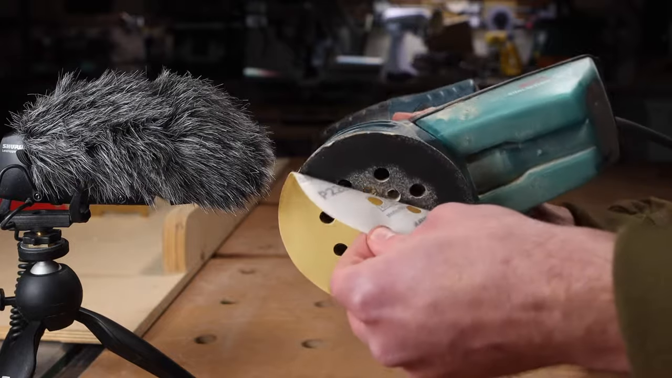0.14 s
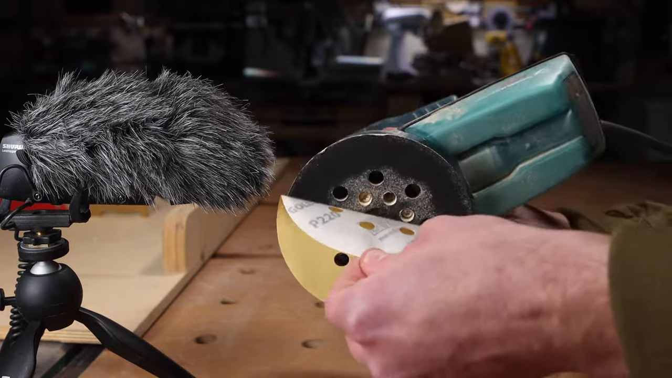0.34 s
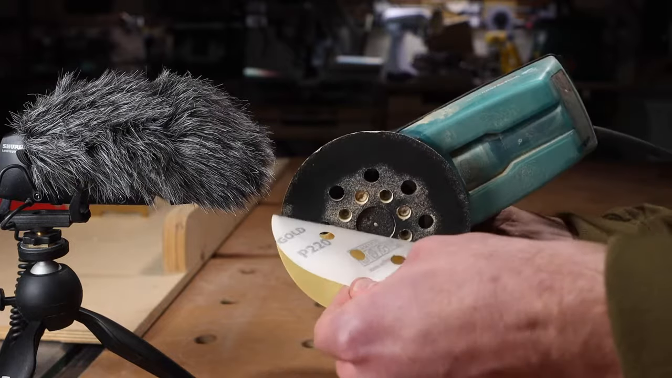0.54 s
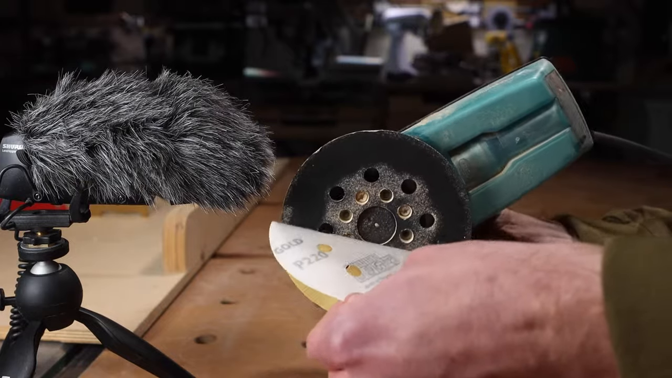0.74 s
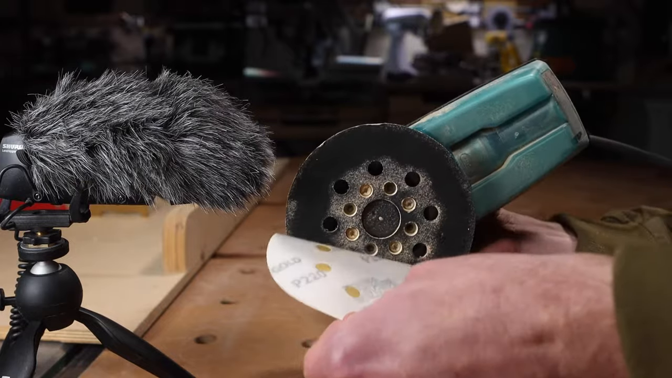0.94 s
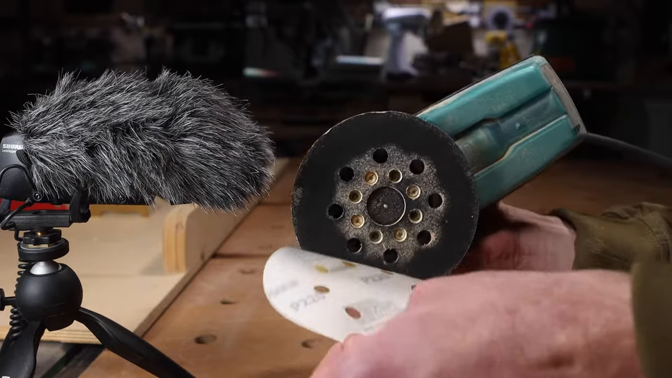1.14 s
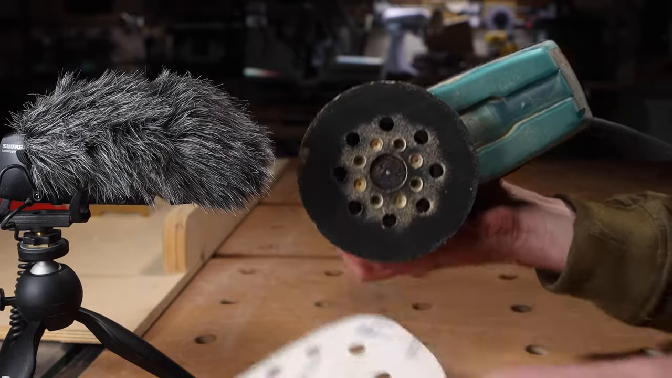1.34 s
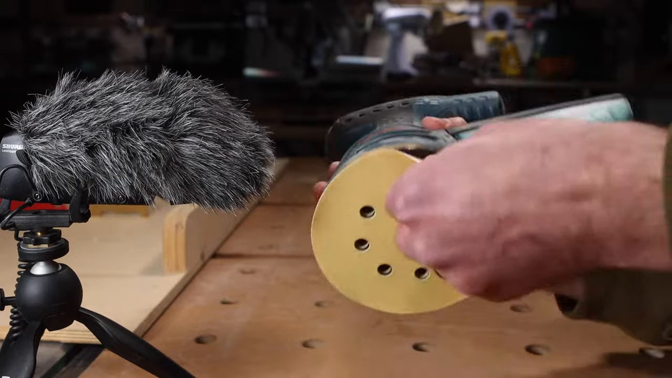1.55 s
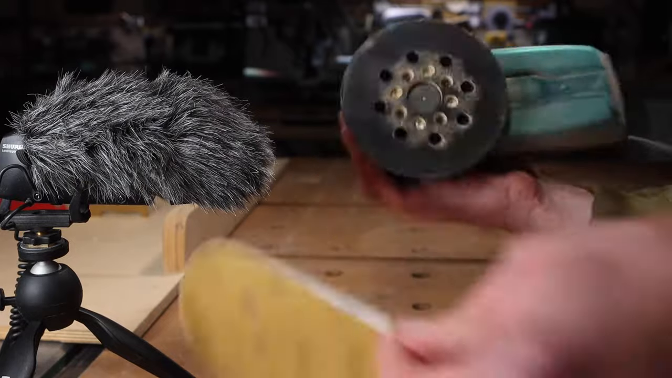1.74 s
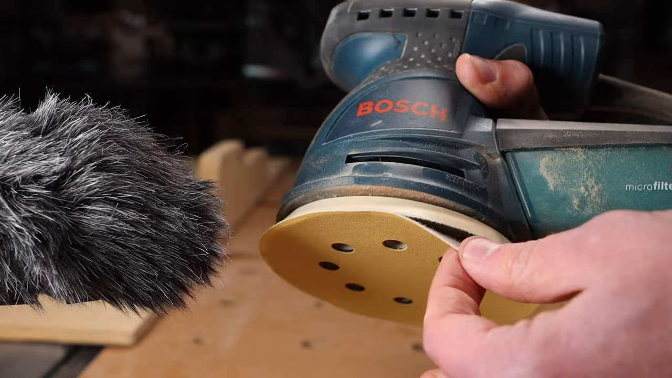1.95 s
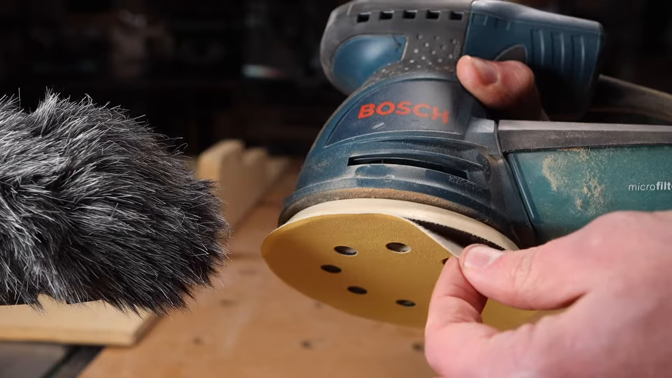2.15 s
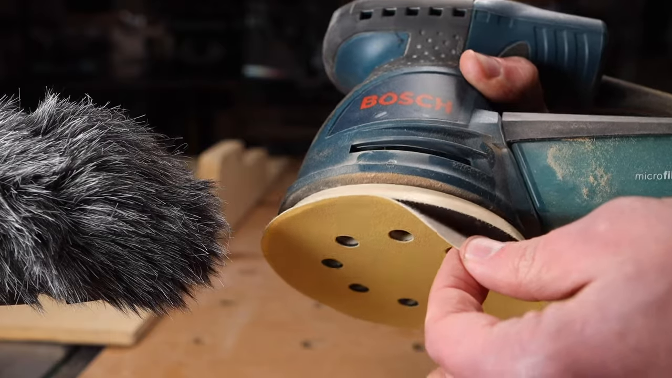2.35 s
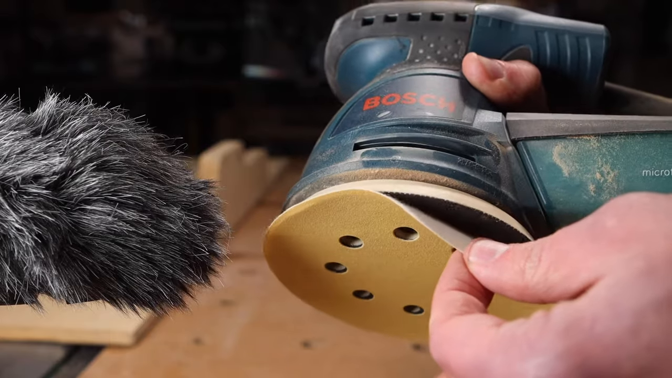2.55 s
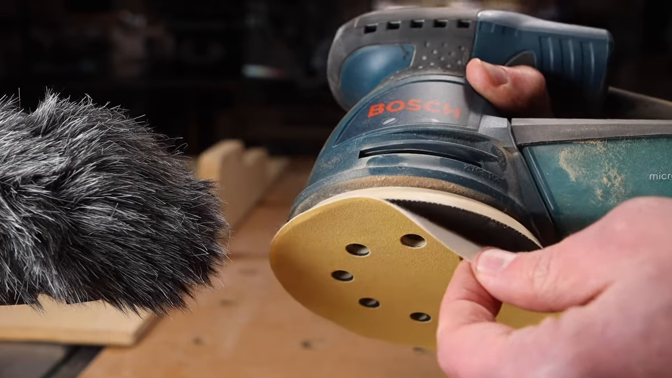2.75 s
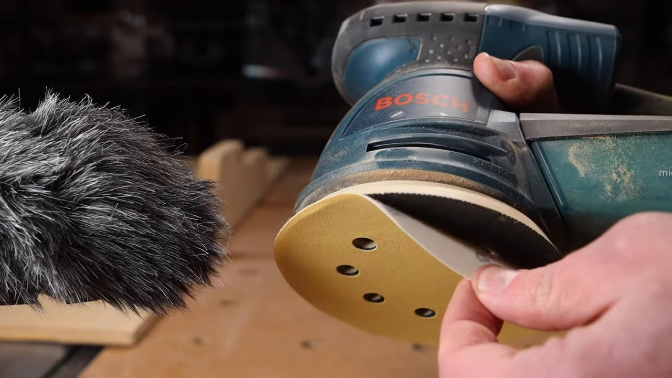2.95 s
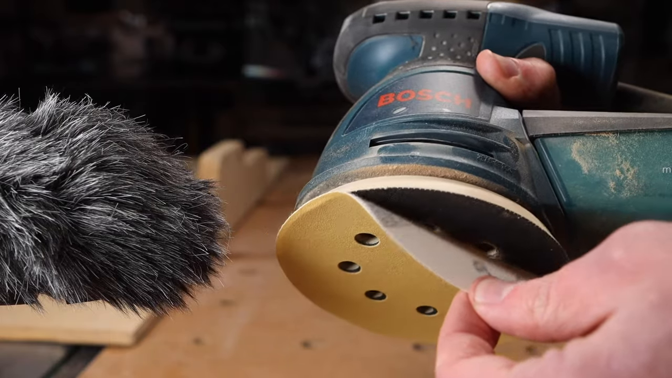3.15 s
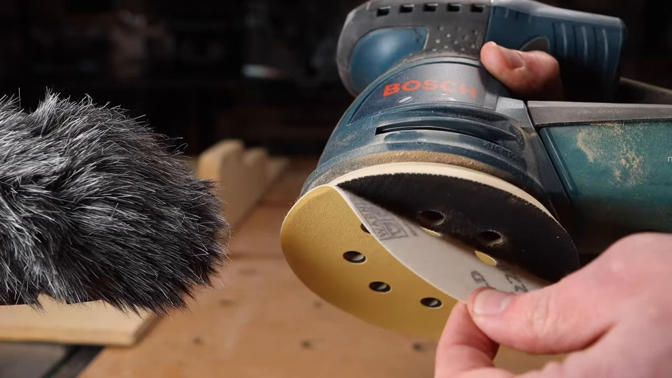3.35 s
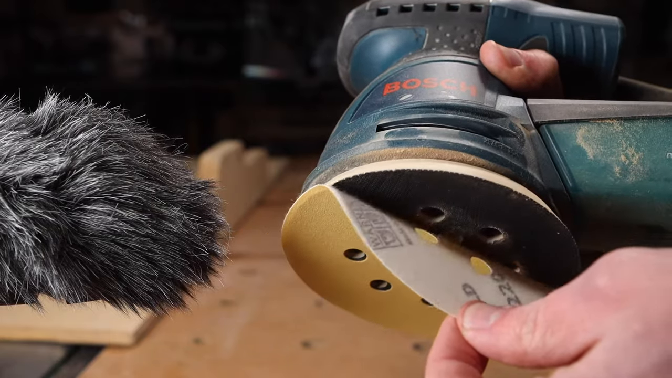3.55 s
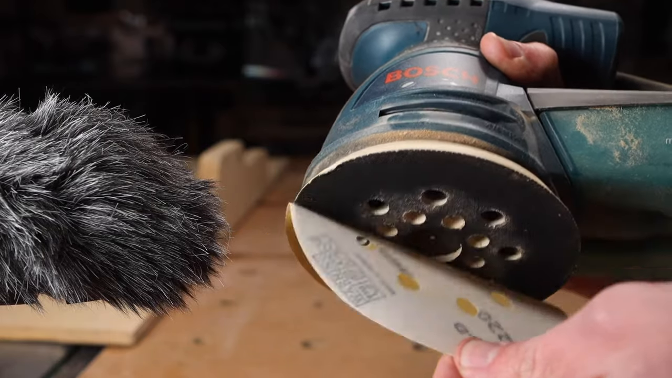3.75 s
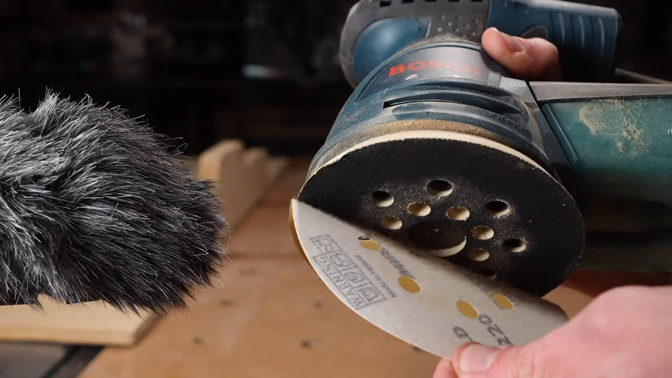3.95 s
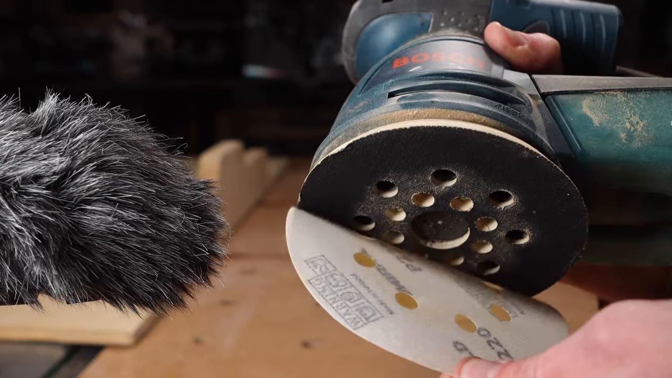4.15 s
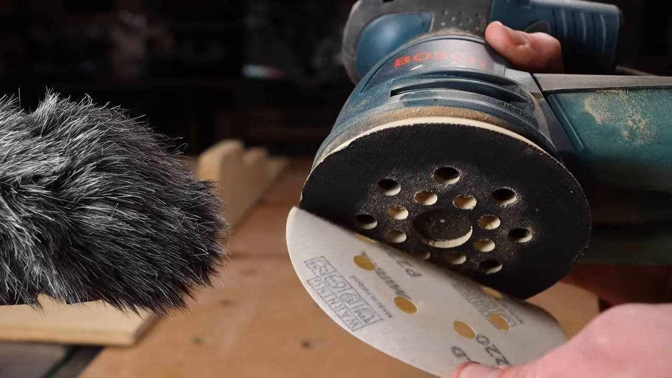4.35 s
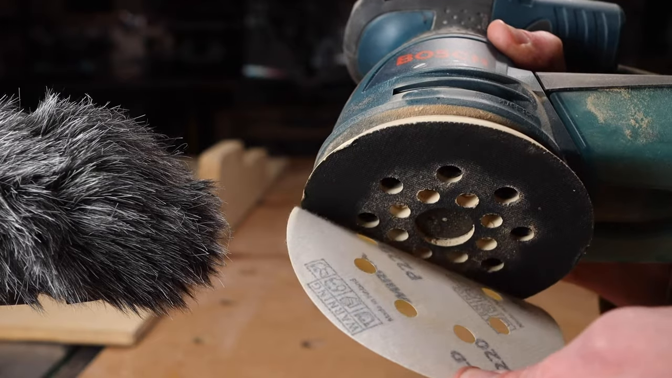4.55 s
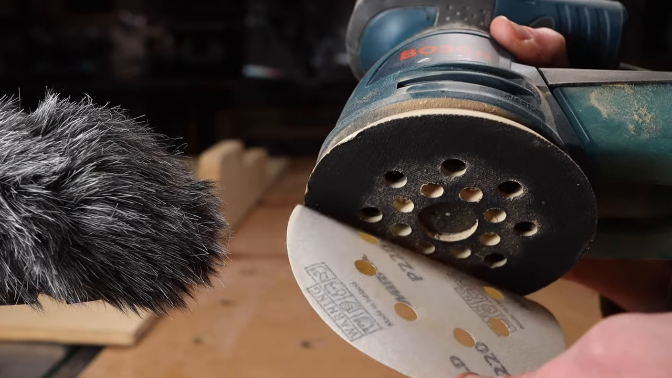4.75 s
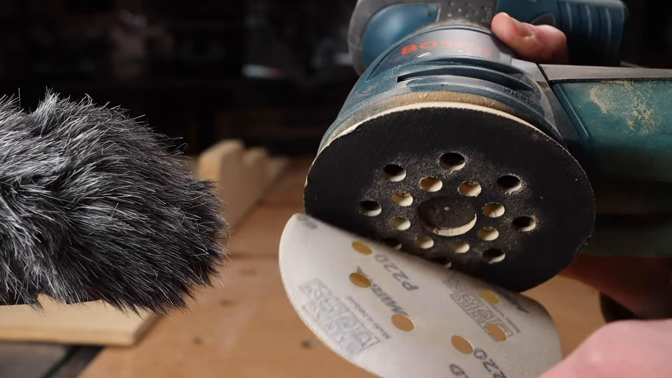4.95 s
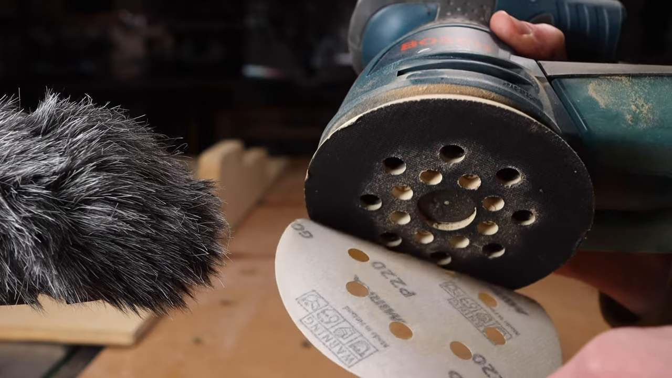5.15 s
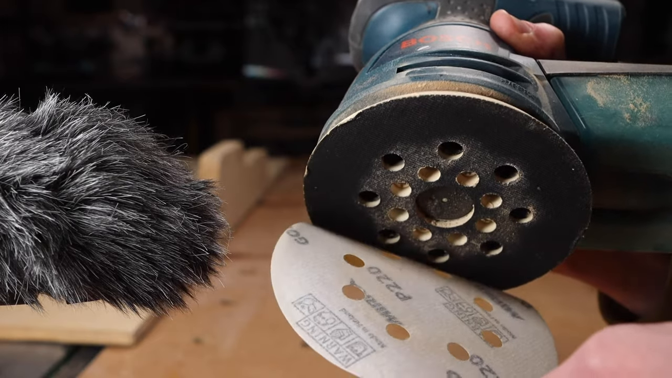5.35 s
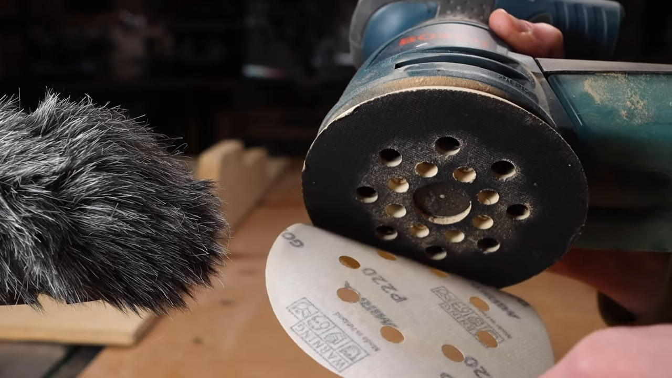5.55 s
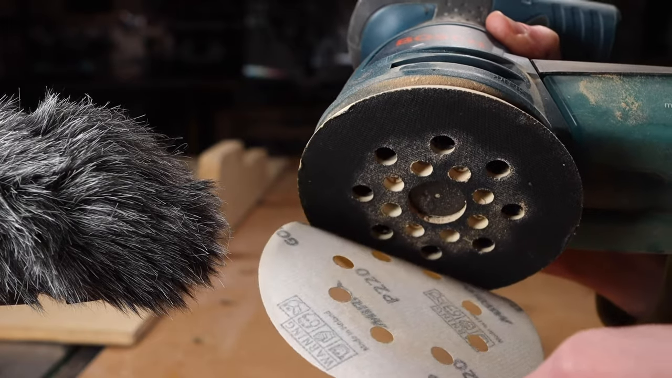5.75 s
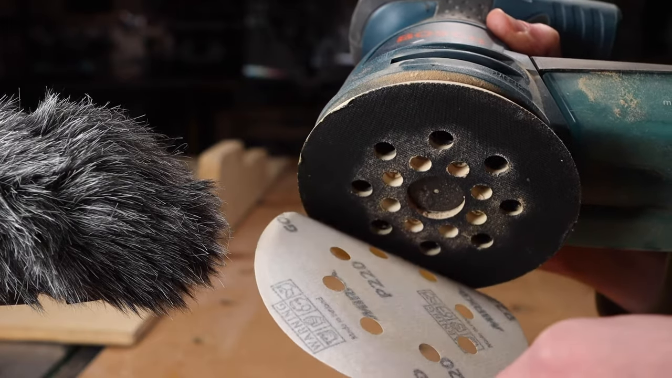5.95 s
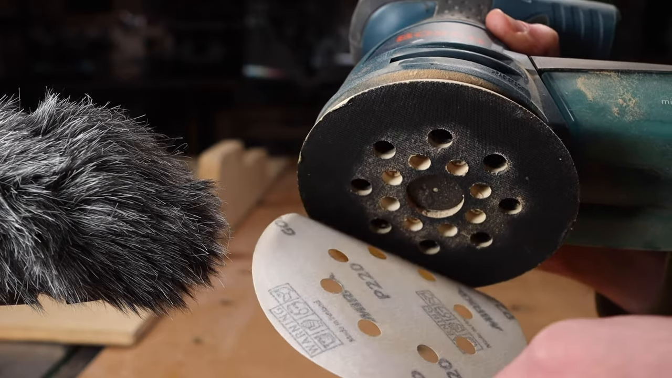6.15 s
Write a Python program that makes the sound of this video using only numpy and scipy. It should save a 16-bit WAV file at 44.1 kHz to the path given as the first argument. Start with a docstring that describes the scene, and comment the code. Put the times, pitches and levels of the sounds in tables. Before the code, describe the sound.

A sanding disc is peeled off a sander's hook-and-loop pad in crackly rips and slow tugs, close up in a quiet workshop.

```python
"""Over the faint hum of a small workshop, a paper sanding disc is peeled off a hook-and-loop pad.
It starts with quick rips: each hook that lets go snaps and rings the paper, fast pulls blur the
snaps into noise, and the loose flap shakes and swings. At 1.36 s the pad is turned to face the
microphone and its tone changes. Slow tugs follow, with single snaps standing out, until the last
fades near 6.3 s. Throughout, the room answers with a short tail."""
import sys
import numpy as np
from scipy import signal
from scipy.fft import rfft, irfft, next_fast_len
from scipy.io import wavfile
from scipy.ndimage import uniform_filter1d, map_coordinates

SR = 44100
rng = np.random.default_rng(int(sys.argv[2]) if len(sys.argv) > 2 else 0)


def write(x):
    x = np.atleast_2d(x).T
    wavfile.write(sys.argv[1], SR, np.round(np.clip(x, -1, 1) * 32767).astype(np.int16))


N = 277830


def amp(db):
    """Decibel law: amplitude grows tenfold every 20 dB."""
    return 10 ** (np.asarray(db) / 20)


def unit_rms(x):
    """Normalisation to a mean power of 1."""
    return x / np.sqrt(np.mean(x ** 2) + 1e-20)


def along(points, hz):
    """Interpolation of (frequency_hz, value) points on a logarithmic frequency axis."""
    point_hz, values = np.transpose(points)
    return np.interp(np.log(hz + 1), np.log(point_hz + 1), values)


def wobble(rate_hz):
    """Slow random modulation: a spline through rate_hz random values a second."""
    knots = rng.standard_normal(int(N * rate_hz / SR) + 4)
    return map_coordinates(knots, [np.arange(N) * rate_hz / SR])


def coloured(x, spectrum, modes):
    """Minimum-phase filtering by a spectrum plus resonance peaks, at a mean power gain of 1."""
    size = next_fast_len(N + 8192)
    hz = np.fft.rfftfreq(size, 1 / SR)
    peaks_db = sum(db / (1 + (2 * (hz - centre) / width) ** 2) for centre, width, db in modes)
    gain = unit_rms(amp(along(spectrum, hz) + peaks_db)) + 1e-5
    cepstrum = irfft(np.log(gain), size)
    cepstrum[1:size // 2] *= 2  # folding onto positive time makes the filter causal
    cepstrum[size // 2 + 1:] = 0
    return irfft(rfft(x, size) * np.exp(rfft(cepstrum)), size)[:N]


# Spectrum of the room's noise floor: frequency_hz, density_db
FLOOR_SPECTRUM = [(25, -20), (120, -8.5), (300, -15), (600, -6), (1000, -16.5), (3000, -15.5), (8000, -22),
                  (16000, -33)]

def room_floor():
    """Stationary broadband noise, in which one narrow resonance is heard as a faint low hum."""
    hum = [(125, 14, 14)]  # centre_hz, width_hz, boost_db
    return amp(-58.5) * unit_rms(coloured(rng.standard_normal(N), FLOOR_SPECTRUM, hum))


# Reverberation time of the workshop: frequency_hz, t60_s
WORKSHOP_DECAY = [(200, 0.55), (1400, 0.43), (4000, 0.45), (12000, 0.26)]

def workshop_reverb(x):
    """Reverberation: convolution with a diffuse tail in which each frequency decays at its own rate."""
    hz, t, noise = signal.stft(rng.standard_normal(SR // 2), SR, nperseg=256)
    decay = amp(-60 * t / along(WORKSHOP_DECAY, hz)[:, None])
    tail = signal.istft(noise * decay, SR, nperseg=256)[1]
    delayed = np.pad(x, (250, 0))
    return signal.fftconvolve(delayed, tail / np.linalg.norm(tail))[:N]


# Swings of the whole loose flap: start_s, length_s, pitch_hz, peak_db
FLAP_SWINGS = [(.44, 0.1, 138.4, -25.5), (.86, 0.096, 118.6, -24), (1.22, 0.059, 146, -18),
               (1.752, 0.037, 72.4, -21)]

def flap_swings():
    """Free vibration: the flap swings for a few cycles, a low tone under a half-sine envelope."""
    out = np.zeros(N)
    for start_s, length_s, pitch_hz, peak_db in FLAP_SWINGS:
        t = np.arange(int(length_s * SR)) / SR
        envelope = amp(peak_db) * np.sin(np.pi * t / length_s)
        out[int(start_s * SR):][:len(t)] -= envelope * np.sin(2 * np.pi * pitch_hz * t)
    return out


# The freed part of the disc, which flaps lower as it grows: time_s, relative_level_db, resonance_hz
FREED_SHEET = [(0.0, -12, 360), (0.32, -17.5, 270), (0.47, -16, 148), (0.75, -9, 166), (0.9, -3.5, 154),
               (1.28, -7.5, 130), (1.34, -25, 95), (1.42, -26, 105), (1.55, -20, 400), (1.65, -15, 433),
               (1.72, -15, 256), (1.78, -6, 94), (1.84, -24, 120), (2.0, -23, 304), (2.6, -21.5, 380),
               (3.25, -19.5, 350), (3.55, -13, 360), (3.8, -21, 265), (4.1, -20.5, 210), (4.4, -24.5, 167),
               (4.95, -22, 215.4), (5.25, -22.5, 340), (6.3, -23, 178)]

def flap_shake(rip):
    """Forced vibration: jerky pulls drive the paper's wandering bending mode over a low push of air."""
    time_s, level_db, resonance_hz = np.transpose(FREED_SHEET)
    force = np.abs(uniform_filter1d(rip ** 2, size=300)) + 1e-6
    jerk = (force / uniform_filter1d(force, size=4000)) ** 0.18  # clumps of hooks jolt the sheet
    hz, t, jolts = signal.stft(rng.standard_normal(N) * jerk, SR, nperseg=2048, noverlap=1536)
    ratio = (hz[:, None] + 1) / np.interp(t, time_s, resonance_hz)
    resonance = 1 / np.sqrt((1 - ratio ** 2) ** 2 + (ratio * 1.01) ** 2)
    bending = resonance * ratio ** 1.52 / (1 + (ratio / 1.99) ** 4)
    air_push = 0.59 * np.exp(-np.log((hz[:, None] + 1) / 105) ** 2 / 0.2)
    gain = np.hypot(bending, air_push)
    gain /= np.sqrt(np.sum(gain ** 2, axis=0))  # same power at every pitch
    shaken = unit_rms(signal.istft(jolts * gain, SR, nperseg=2048, noverlap=1536)[1][:N])
    linger_s, firm_rip_db, flap_db_per_rip_db = 0.01, -18.5, 1.5
    pole = np.exp(-1 / (linger_s * SR))
    drive_power = signal.lfilter([1 - pole], [1, -pole], rip ** 2) / amp(firm_rip_db) ** 2
    level = amp(np.interp(np.arange(N) / SR, time_s, level_db) - 21)
    return level * np.abs(drive_power) ** (flap_db_per_rip_db / 2) * shaken


def sheet_flexing(x, depth_db):
    """Spectral modulation: as the sheet changes shape, its resonances swell and fade at random."""
    spectra = signal.stft(x, nperseg=128)[2]
    field = uniform_filter1d(rng.standard_normal(spectra.shape), size=2, axis=0)  # smooth over pitch
    field = uniform_filter1d(field, size=40, axis=1)  # and over time
    return signal.istft(spectra * amp(depth_db * unit_rms(field)), nperseg=128)[1][:N]


def fibre_rattle(kicks, spike_gain, rise_s, lowpass_hz, t60_s=0.014):
    """Impulse excitation: each kick starts a damped rattle of fibres, with a spike just after onset."""
    t = np.arange(SR // 20) / SR
    envelope = amp(-60 * t / t60_s) * (1 - np.exp(-t / rise_s))
    power = signal.fftconvolve(kicks ** 2, envelope ** 2)[:N]  # overlapping rattles add in power
    noise = np.sqrt(np.abs(power)) * rng.standard_normal(N)
    pole = np.exp(-2 * np.pi * lowpass_hz / SR)
    rattle = signal.lfilter([1 - pole], [1, -pole], noise)
    return rattle + spike_gain * np.pad(kicks, (SR // 3000, 0))[:N]


# Spectrum of a hook's bright tick: frequency_hz, density_db
TICK_SPECTRUM = [(1410, -58.5), (2400, -19), (3060, -19), (3540, -3.5), (5810, 0.5), (7720, -4), (9010, -5),
                 (15200, -13.5), (16000, -30), (16700, -39)]
# Ring of the freed paper, with the pad side-on and facing: frequency_hz, density_db
RING_SIDE = [(240, -19), (400, -11), (552, -9.5), (802, -10), (1040, -5), (1710, -1), (1880, 1.5),
             (3200, -2), (4160, -34), (7040, -120)]
RING_FRONT = [(240, -36), (400, -11), (868, -17.5), (1090, -6), (1570, 3), (2110, -0.5), (3200, -2.5),
              (4160, -35.5), (7040, -120)]
# Cavity modes of the holed pad, side-on and facing: centre_hz, width_hz, boost_db
CAVITY_SIDE = [(2290, 470, 2), (3130, 470, 2.5), (6650, 910, 3)]
CAVITY_FRONT = [(1560, 220, 1), (3093, 590, 6), (4350, 610, 1.5), (5640, 1360, 1.5)]

def pad_radiation(tick, ring, turn_s=1.36):
    """Directivity: tick and ring change colour when the pad turns from side-on to facing."""
    side_on = np.arange(N) < turn_s * SR
    return (coloured(tick * side_on, TICK_SPECTRUM, CAVITY_SIDE)
            + coloured(ring * side_on, RING_SIDE, CAVITY_SIDE)
            + coloured(tick * ~side_on, TICK_SPECTRUM, CAVITY_FRONT)
            + coloured(ring * ~side_on, RING_FRONT, CAVITY_FRONT))


# Tugs on the disc: start_s, swell_s, hold_s, ease_s, pull_db, start_below_pull_db, ring_over_tick_db
DISC_TUGS = [(0.0, 0.0063, 0.073, 0.018, -19, -1, -2.5), (0.176, 0.12, 0.041, .025, -18.5, 8, -0.5),
             (0.381, 0.04, 0.089, 0.031, -18, 17, 0), (0.585, 0.0039, 0.18, 0.0093, -25.5, -1, 0.5),
             (0.827, 0.015, 0.41, 0.028, -21.5, 17, 1), (1.232, .05, 0.013, .008, -15.5, 7.5, 2),
             (1.41, 0.0065, 0.078, .01, -35, 2, -6), (1.51, 0.091, 0.042, .01, -25.5, 7.5, 0.5),
             (1.606, 0.053, 0.076, .011, -12, 12, 0), (2.154, 0.025, 0.012, 0.012, -24.5, 8, -7.5),
             (2.281, 0.0069, 0.077, 0.038, -30, 11, -1.5), (2.433, 0.0054, .015, .01, -27, 4, -9),
             (2.492, 0.054, 0.031, 0.028, -24.5, 10.5, -2.5), (2.78, .035, 0.034, 0.0074, -21, 13, -4),
             (2.862, 0.014, 0.06, 0.048, -20.5, 11, -3.5), (2.96, 0.012, 0.092, 0.031, -26, -9, -1.5),
             (3.14, 0.088, 0.033, 0.043, -16.5, 14.5, -3), (3.408, .01, 0.015, 0.0062, -34, 4, -3.5),
             (3.462, .06, .045, .008, -23.5, 7, -1.5), (3.591, 0.019, 0.028, .01, -24, -4, -4),
             (3.647, .045, 0.12, .016, -15.5, 7.5, -2.5), (4.02, .02, 0.059, 0.024, -17, 11, -2.5),
             (4.281, 0.051, 0.017, 0.02, -23, 8, -3.5), (4.441, 0.0038, 0.015, 0.0056, -34, 6, 2.5),
             (4.512, 0.0073, 0.011, 0.019, -34, 4, 0), (4.6, 0.0031, 0.0049, 0.0071, -25, 4, -4.5),
             (4.657, 0.05, 0.034, .01, -28.5, 8.5, -4.5), (4.823, 0.014, 0.063, 0.014, -28.5, 3.5, -0.5),
             (4.915, .015, 0.079, 0.034, -24.5, 8.5, -2.5), (5.095, 0.036, 0.058, 0.034, -23.5, 7.5, -2.5),
             (5.235, 0.037, 0.026, 0.027, -22.5, 14, -2.5), (5.403, 0.011, .02, .008, -33.5, -6.5, -2.5),
             (5.507, 0.036, 0.019, 0.043, -31, -3, -4), (5.7, 0.048, 0.079, 0.014, -35.5, 0, 0.5),
             (5.9, 0.0043, 0.039, 0.014, -24.5, 4, -5.5)]

def tug_envelopes():
    """Amplitude envelopes: pull strength and relative paper ring in dB; the strongest tug prevails."""
    sag_db, end_drop_db = 1.5, 12  # the hold sags as fewer hooks are left, then the tug eases off
    ring_growth_db = 1  # the paper rings more as more of it hangs free
    t = np.arange(N) / SR
    pull_db, ring_db = np.full(N, -120.), np.zeros(N)
    for start_s, swell_s, hold_s, ease_s, level_db, below_db, ring_over_db in DISC_TUGS:
        corners_s = start_s + np.cumsum([0, swell_s, hold_s, ease_s])
        tug_db = level_db - np.interp(t, corners_s, [below_db, 0, sag_db, end_drop_db])
        active = (t >= start_s) & (t < corners_s[-1]) & (tug_db > pull_db)
        progress = (t[active] - start_s) / (corners_s[-1] - start_s)
        pull_db[active] = tug_db[active]
        ring_db[active] = ring_over_db + ring_growth_db * (progress - .5)
    return pull_db, ring_db


# The clearest single hooks letting go: time_s, relative_level_db
SINGLE_SNAPS = [(0.1176, -14), (0.1684, -14), (0.179, -10), (0.399, -8), (0.5886, -5), (0.6225, -3),
                (0.6968, -8), (0.7243, -8), (0.7672, -10), (0.8305, -10), (0.8814, -5), (1.2266, -4),
                (1.2904, -4), (1.4262, -18), (1.4934, -19), (1.5, -16), (1.7424, -5), (1.9275, -14),
                (1.9334, -14), (1.9589, -15), (1.9704, -20), (1.9844, -14), (2.0014, -18), (2.0258, -14),
                (2.0462, -13), (2.0514, -19), (2.0842, -16), (2.1485, -11), (2.1665, -9), (2.1789, -9),
                (2.2074, -20), (2.2558, -15), (2.2644, -18), (2.2917, -14), (2.3111, -9), (2.3595, -11),
                (2.371, -7), (2.4059, -17), (2.4254, -14), (2.4514, -13), (2.4823, -15), (2.5012, -12),
                (2.5401, -6), (2.604, -17), (2.6194, -19), (2.7013, -17), (2.7124, -22), (2.7312, -19),
                (2.7444, -20), (2.7616, -13), (2.7756, -13), (2.8065, -7), (2.8244, -6), (2.8689, -8),
                (2.8853, -2), (2.9414, -6), (3.014, -12), (3.047, -8), (3.1208, -18), (3.1393, -11),
                (3.1454, -11), (3.1672, -13), (3.1892, -7), (3.2286, -2), (3.2844, -3), (3.3169, -6),
                (3.3667, -14), (3.3754, -21), (3.4092, -12), (3.4426, -9), (3.477, -7), (3.5314, -5),
                (3.5643, -7), (3.5907, -9), (3.6142, -5), (3.6476, -5), (3.686, -2), (3.7324, 0),
                (3.7648, 0), (3.8044, -1), (3.8294, -7), (3.9858, -9), (3.9974, -15), (4.0124, -16),
                (4.0248, -6), (4.0464, -3), (4.1114, -3), (4.135, -7), (4.1604, -8), (4.1844, -18),
                (4.2018, -11), (4.2328, -18), (4.2453, -17), (4.2782, -5), (4.2944, -7), (4.3171, -6),
                (4.3544, -10), (4.3654, -14), (4.4313, -6), (4.4528, -8), (4.4638, -6), (4.4714, -9),
                (4.5126, -17), (4.5261, -14), (4.5585, -22), (4.5865, -15), (4.6054, -9), (4.6249, -18),
                (4.6389, -12), (4.6518, -11), (4.6718, -11), (4.6952, -12), (4.7087, -9), (4.801, -16),
                (4.8239, -11), (4.8364, -11), (4.9033, -7), (4.9387, -6), (4.9671, -10), (5.002, -9),
                (5.0544, -24), (5.0684, -19), (5.0853, -14), (5.0998, -13), (5.1307, -7), (5.1704, -9),
                (5.246, -12), (5.2724, -6), (5.3024, -9), (5.3214, -14), (5.3542, -25), (5.3797, -16),
                (5.3946, -7), (5.4405, -17), (5.4979, -19), (5.5149, -15), (5.5423, -13), (5.5772, -15),
                (5.6471, -24), (5.6645, -20), (5.678, -22), (5.7084, -14), (5.7274, -12), (5.7468, -11),
                (5.7754, -15), (5.7872, -15), (5.8092, -15), (5.8174, -15), (5.8401, -19), (5.8706, -13),
                (5.894, -13), (5.903, -9), (5.9114, -11), (5.9254, -12), (5.9688, -15), (5.9778, -14),
                (6.0124, -24), (6.0232, -21), (6.0716, -16), (6.0831, -14), (6.0944, -17), (6.102, -13),
                (6.1205, -20), (6.1364, -24), (6.1574, -14), (6.2123, -30), (6.2262, -24), (6.2741, -19),
                (6.2904, -28)]

def hook_rip():
    """Shot noise: hooks let go at random, faster under a harder pull, and single snaps stand out."""
    pull_db, ring_db = tug_envelopes()
    hooks_per_s = np.clip(800 * amp(1.1 * (pull_db + 24)), 260, 5000)
    hooks_per_s *= amp(5 * wobble(rate_hz=60))  # hooks fail in clumps
    released = rng.random(N) < hooks_per_s / SR
    strength = amp(4.06 * np.clip(np.abs(rng.standard_normal(N)), 0, 2.4))
    ring_scatter = rng.standard_normal(N)
    kicks = released * strength * amp(pull_db + 6)  # every release moves the air the same way
    kicks /= np.sqrt(hooks_per_s / 100)  # many hooks share the same energy
    ring_kicks = kicks * amp(ring_db + 0.95 * ring_scatter)
    snap_s, snap_db = np.transpose(SINGLE_SNAPS)
    at = np.round(snap_s * SR).astype(int)
    kicks[at] += amp(snap_db - 6.5)
    ring_kicks[at] += amp(snap_db - 11.5 + 2.4 * ring_scatter[at])
    tick = fibre_rattle(kicks, spike_gain=3.16, rise_s=0.00029, lowpass_hz=6800)
    ring = fibre_rattle(ring_kicks, spike_gain=2.42, rise_s=0.00068, lowpass_hz=7750)
    return sheet_flexing(pad_radiation(tick, ring), depth_db=2.0)


def scene():
    """Superposition of the room's floor, its reverberation and the direct peel, in one channel."""
    rip = hook_rip()
    peel = rip + flap_shake(rip) + flap_swings()
    return (room_floor() + amp(-19.0) * workshop_reverb(peel) + peel)[None]


def record(dry):
    """Soft saturation and band limiting: peaks round off near full scale and the top treble fades."""
    ceiling, top_hz, fade_hz = 0.9, 16850, 900
    rounded = dry / (1 + np.abs(dry / ceiling) ** 6) ** (1 / 6)
    size = next_fast_len(N + 8192)
    lowpass = np.clip((top_hz - np.fft.rfftfreq(size, 1 / SR)) / fade_hz, 0, 1) ** 2
    return irfft(rfft(rounded, size) * lowpass, size)[:, :N]


dry = scene()
out = record(dry)
write(out)
```